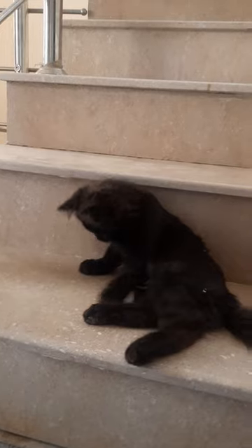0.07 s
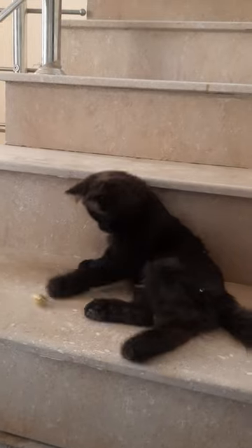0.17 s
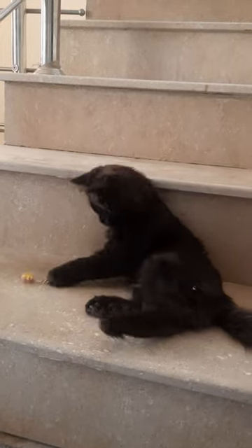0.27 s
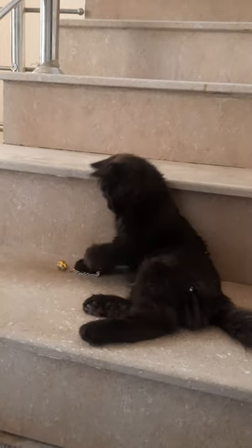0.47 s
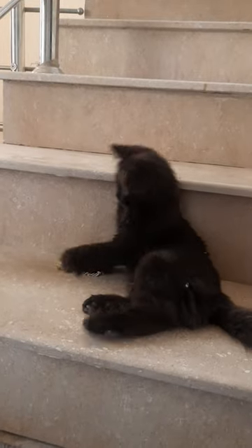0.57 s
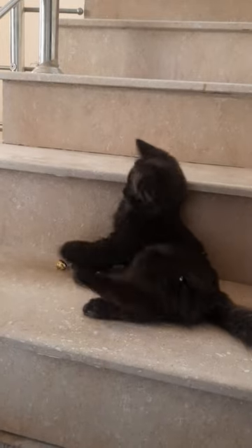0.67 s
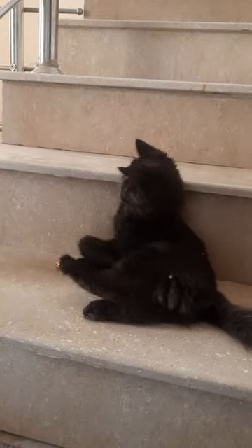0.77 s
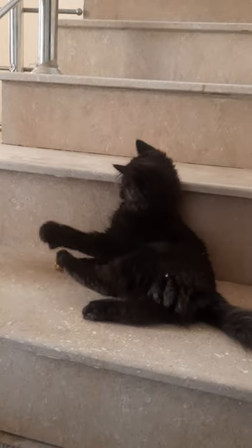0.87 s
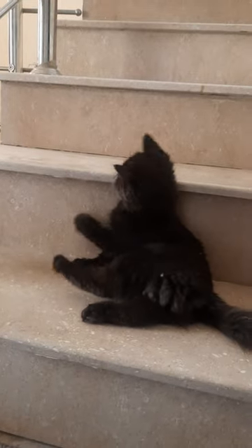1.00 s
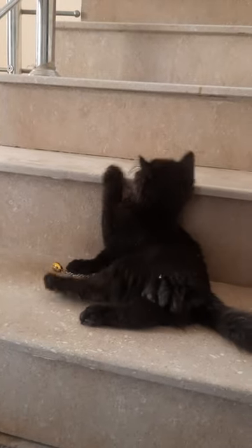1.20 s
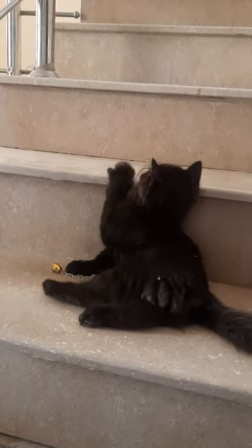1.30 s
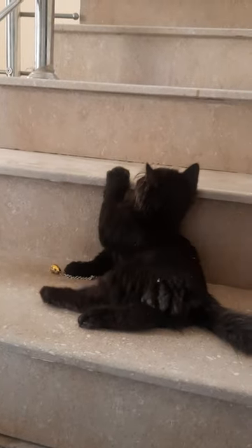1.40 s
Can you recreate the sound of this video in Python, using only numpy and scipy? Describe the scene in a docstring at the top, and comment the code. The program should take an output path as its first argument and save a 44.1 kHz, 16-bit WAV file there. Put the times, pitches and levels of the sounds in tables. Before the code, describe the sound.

A small metal bell jingles slightly to the left, batted by a kitten on a stone step. The quick, high flurry starts around 0.15 seconds, peaks near 0.25 and is choked at about 0.4. A few soft tinkles follow until 0.8, echoing in the stairwell, with one barely audible tick near 1.3. A quiet building hum and rumble continue throughout, with faint hollow tones swelling and fading from about 0.7 seconds.

```python
"""A small metal jingle bell rings as a kitten bats it across a stone step in a stairwell.
The loose pellet inside strikes the shell in a quick flurry, a paw chokes the ring,
and a few soft strikes follow as the bell rolls to rest. The hard walls carry the ring on
over the low hum and rumble of the building, where faint hollow tones swell and fade."""
import sys
import numpy as np
from scipy import signal
from scipy.fft import rfft, irfft
from scipy.io import wavfile

SR = 44100
rng = np.random.default_rng(int(sys.argv[2]) if len(sys.argv) > 2 else 0)


def dump(signal):
    """Clip the signal to [-1, 1] and save it as 16-bit WAV at the path in sys.argv[1]."""
    limited = np.clip(np.atleast_2d(signal).T, -1, 1)
    pcm = np.round(limited * 32767).astype(np.int16)
    wavfile.write(sys.argv[1], SR, pcm)


N = 63945


def amp(db):
    """Turns decibels into a factor to multiply by."""
    return 10 ** (np.asarray(db) / 20)


def unit(x):
    """Scales a signal to an average (rms) strength of 1."""
    return x / np.sqrt(np.mean(x ** 2) + 1e-20)


def fade(t, fade_s):
    """A dying-away curve; the fade time is how long it takes to drop by 60 dB."""
    return np.exp(-np.log(1000) * t / fade_s)


def read(points, hz):
    """Reads between the rows of a frequency table, giving each octave equal room."""
    f, value = np.transpose(points)
    return np.interp(np.log(hz + 1), np.log(f + 1), value)


def add(mix, start_s, sound):
    """Mixes a sound in at its start time."""
    part = mix[round(start_s * SR):][:len(sound)]
    part += sound[:len(part)]


def building():
    """Steady air noise and a wavering hum, with nearly the same bass on both sides."""
    # tone colour of the air noise: f/Hz, relative level/dB
    air_colour = [(25, -31), (40, -16), (54, 0.5), (85, -12.5), (120, -4), (180, -11), (260, -14),
                  (330, -7), (540, -18), (750, -17), (1000, -24), (1500, -28), (2250, -28.5), (2900, -44.5),
                  (4200, -46.5), (5200, -49.5), (15500, -51)]
    # how alike left and right are: f/Hz, likeness/0-1
    likeness = [(60, .93), (150, .91), (300, .72), (600, .5), (1200, .25), (15000, .1)]
    # how much louder the left is: f/Hz, left minus right/dB
    balance = [(60, -2), (130, -3.5), (300, -0.5), (650, 9), (1300, -0.5), (15000, 0.5)]
    # narrow bands of noise that hum: f/Hz, level/dB, width/Hz
    hum_bands = [(76, -69.5, 5), (116.8, -61.5, 11), (300, -71.5, 12), (463, -75, 4.4), (628, -78.5, 3.3),
                 (808.3, -67.5, 3)]
    air_db = -55.5
    hz = np.fft.rfftfreq(N, 1 / SR)
    a, b, c, d = rng.standard_normal((4, len(hz)))
    same = read(likeness, hz)
    left = a + 1j * b  # a random strength and phase at every frequency
    right = same * left + np.sqrt(1 - same ** 2) * (c + 1j * d)
    spectrum = np.array([left, right]) * amp(np.outer([.5, -.5], read(balance, hz)))
    out = amp(air_db) * unit(irfft(spectrum * amp(read(air_colour, hz)), N))
    for pitch, db, width in hum_bands:
        band = spectrum / (1 + ((hz - pitch) / (width / 2)) ** 2)
        out += amp(db) * unit(irfft(band, N))
    return out


def bass_swell(x):
    """The low rumble swells and sinks."""
    # boost or cut of the bass: t/s, gain/dB
    swells = [(0, -6), (.11, 6), (.21, 0), (.34, 4), (.46, -0.5), (.58, -1), (.8, 2.5), (.92, -1.5),
              (1.0, -8), (1.17, -1.5), (1.261, 4), (1.35, -0.5), (1.45, -1)]
    bass = signal.sosfiltfilt(signal.butter(2, 220, fs=SR, output="sos"), x)  # below 220 Hz
    gain = amp(np.interp(np.arange(N) / SR, *np.transpose(swells)))
    return x + bass * (gain - 1)


def rolling_pellet():
    """The rolling pellet chatters on the shell: tiny, short rings near the bell's lowest note."""
    # loudness of the rolling: t/s, level/dB
    loudness = [(.09, -89.5), (0.131, -68), (.16, -40.5), (.21, -57), (.3, -33.5), (.39, -44), (.42, -60),
                (.56, -68.5), (.61, -57), (.71, -59.5), (.78, -53), (.86, -62), (.95, -84.5), (1.25, -97.5),
                (1.31, -82), (1.4, -98.5)]
    taps_per_s, pitch_hz, rise_s, fade_s = 400, 4179, .0015, .02
    t = np.arange(SR // 10) / SR
    taps = rng.standard_normal(N) * (rng.random(N) < taps_per_s / SR)
    rise = (1 - np.exp(-t / rise_s)) ** 2
    ring = np.sin(2 * np.pi * pitch_hz * t) * rise * fade(t, fade_s)
    chatter = unit(signal.fftconvolve(taps, ring)[:N])
    return chatter * amp(np.interp(np.arange(N) / SR, *np.transpose(loudness)))


def bell_strikes():
    """Each pellet strike clicks and rings the shell; touching the stone bends the lowest note."""
    # the shell's notes, lowest first; a twin close in pitch makes a note throb:
    # f/Hz, fade time/s, gap to the twin/Hz, twin strength/0-1
    shell_notes = [(4194, 0.065, 55, 0), (7358, 0.22, 4.2, .12), (8934, 0.32, 8, .1), (11296, .15, 24, 0.8),
                   (15690, .23, 35, .6)]
    # pellet strikes: t/s, drop of the lowest note/Hz, click level/dB, then each note's level/dB
    strikes = [ (0.143, -18, -66, -55.5, -71.5, -87.5, -71, -97),
               (0.1523, 5, -65, -30.5, -71, -69, -58.5, -87), (0.172, 45, -42, -28.5, -62, -56, -60, -55),
               (.1868, 41, -48, -18, -49, -56, -51.5, -51), (0.1983, 14, -32, -11, -63, -63, -46, -46),
               (0.2076, -12, -22.5, -9.5, -30.5, -61.5, -33, -55),
               (.2320, 15, -20.5, -1, -26, -56.5, -32, -30),
               (0.2456, 73.5, -28.5, -36, -45.5, -60.5, -49.5, -36),
               (0.2605, 38, -40, -17.5, -53, -62, -41.5, -37),
               (.2690, -70.5, -41.5, -25.5, -50.5, -65, -52.5, -52),
               (.2750, 59, -32.5, -34, -41, -67, -45, -51), (.2945, 6, -37, -18.5, -44, -61.5, -42.5, -60),
               (.2990, 1, -55, -16, -48, -71, -61, -59), (.3365, 53, -35.5, -19, -64.5, -40, -36.5, -31),
               (0.376, 76, -68, -60, -54, -57, -67, -37), (0.442, 10, -74, -49, -57, -91, -74, -68),
               (0.479, -4, -71.5, -39, -69.5, -93, -76, -67),
               (0.572, -16.5, -71, -44, -78.5, -88, -90, -93),
               (.6190, 48.5, -72, -41.5, -82, -96, -89, -91.5),
               (.6665, 75, -53.5, -43, -70, -59.5, -53.5, -56.5),
               (.7395, 5.5, -62.5, -33.5, -73, -67, -72.5, -84),
               (.7725, -27, -72, -41, -74, -76, -80.5, -85.5),
               (1.293, -29.5, -90, -69, -102, -96.5, -98, -95.5)]
    # how fast the ring builds up: click level/dB, rise time/s
    rise_times = [(-64.5, 0.00044), (-35, 0.00047), (-15, 0.00081)]
    click_s = .0012
    paw_lands_s, paw_fade_s = .379, .18
    out, t = np.zeros(N), np.arange(SR // 2) / SR
    click_band = signal.butter(2, [2300, SR / 2 - 100], "band", fs=SR, output="sos")
    aims = [np.ones(2 * N)] + [tumble() for _ in shell_notes[1:]]
    for start, drop_hz, click_db, *note_dbs in strikes:
        burst = rng.standard_normal(len(t)) * np.exp(-t / click_s)
        sound = amp(click_db) * signal.sosfilt(click_band, burst)
        rise_s = np.interp(click_db, *np.transpose(rise_times))
        rise = (1 - np.exp(-t / rise_s)) ** 2
        for k, (hz, fade_s, gap_hz, twin) in enumerate(shell_notes):
            cycles = hz * (start + t) - (k == 0) * drop_hz * t
            pair = np.exp(2j * np.pi * cycles) * (1 + twin * np.exp(2j * np.pi * gap_hz * t))
            aim = aims[k][round(start * SR):][:len(t)]
            ring = (pair * aim).imag
            sound += amp(note_dbs[k]) * ring * rise * fade(t, fade_s)
        # a paw lands on the bell and chokes the strikes that came before it
        held_s = (start < paw_lands_s) * np.maximum(start + t - paw_lands_s, 0)
        add(out, start, sound * fade(held_s, paw_fade_s))
    return out


def tumble():
    """The turning bell aims a high note toward us, then away: its strength and phase sway at random."""
    sway_hz, depth = 26, .22
    hz = np.fft.fftfreq(2 * N, 1 / SR)
    sway = np.fft.ifft(np.exp(2j * np.pi * rng.random(2 * N) - (hz / sway_hz) ** 2))
    return 1 + depth * sway / np.std(sway)


def direct_sound(x):
    """The bell lies to the left, so its sound reaches the right side later and softer."""
    # right side compared with the left: f/Hz, level/dB
    right_levels = [(4200, -4.5), (7300, 0), (9000, -7), (11300, -8.5), (15700, -4)]
    delay_s = .000238
    hz = np.fft.rfftfreq(2 * N, 1 / SR)
    right_filter = amp(read(right_levels, hz)) * np.exp(-2j * np.pi * hz * delay_s)
    right = irfft(rfft(x, 2 * N) * right_filter)[:N]
    return np.array([x, right])


def stairwell(x):
    """Quick echoes from the nearby steps, then a long tail whose treble dies first."""
    # how long the tail lasts: f/Hz, fade time/s
    fade_times = [(500, 3.2), (2000, 0.86), (4200, 0.6727), (7500, 0.37), (9000, 0.46), (11300, 0.3053),
                  (16000, 0.25)]
    # tone colour of the tail: f/Hz, relative level/dB
    tail_colour = [(1000, -3), (3000, -6), (4200, -11), (5500, 2), (7400, -3), (11300, -5), (16000, -3)]
    first_echo_s, early_fade_s, early_db = .004, .074, -7
    t = np.arange(SR) / SR
    tail_noise, early_noise = rng.standard_normal((2, SR)) * (t > first_echo_s)
    hz, times, bands = signal.stft(tail_noise, SR, nperseg=256)
    fade_s = read(fade_times, hz)[:, None]
    bands *= amp(read(tail_colour, hz))[:, None] * fade(times, fade_s)
    bands *= np.sqrt(2 * np.log(1000) / (fade_s * SR))  # a longer fade adds no extra energy
    tail = signal.istft(bands, SR, nperseg=256)[1][:SR]
    early = amp(early_db) * unit(early_noise * fade(t, early_fade_s)) / np.sqrt(SR)
    echoes = signal.fftconvolve(x, tail + early)[:N]
    return echoes


def hollow_tones():
    """Faint wavering tones rise out of the background on the left and die away."""
    # the tones: start t/s, f/Hz, level on the left/dB
    tones = [(.71, 632, -55), (.765, 757, -55), (.79, 700, -59), (.86, 593, -62.5), (.97, 633, -61),
             (1.0, 463, -61.5)]
    rise_s, width_hz, right_db = .039, 9.4, -8
    out, t, hz = np.zeros(N), np.arange(SR) / SR, np.fft.rfftfreq(SR, 1 / SR)
    swell = t / rise_s * np.exp(1 - t / rise_s)
    for start, pitch, db in tones:
        spectrum = np.exp(2j * np.pi * rng.random(len(hz)))
        band = spectrum / (1 + ((hz - pitch) / width_hz) ** 2)
        add(out, start, amp(db) * unit(irfft(band, SR)) * swell)
    return np.array([out, amp(right_db) * out])


def scene():
    """The bell and its echoes over the sounds of the building, as left and right channels."""
    bell = bell_strikes() + rolling_pellet()
    echoes = np.array([stairwell(bell), amp(-2.5) * stairwell(bell)])  # each side has its own echoes
    return direct_sound(bell) + echoes + bass_swell(building()) + hollow_tones()


def record(dry):
    """Cuts away the very highest treble."""
    cutoff_hz = 16120
    low_pass = signal.firwin(511, cutoff_hz, window=("kaiser", 9), fs=SR)
    return signal.oaconvolve(dry, low_pass[None], "same")


dry = scene()
out = record(dry)
dump(out)
```